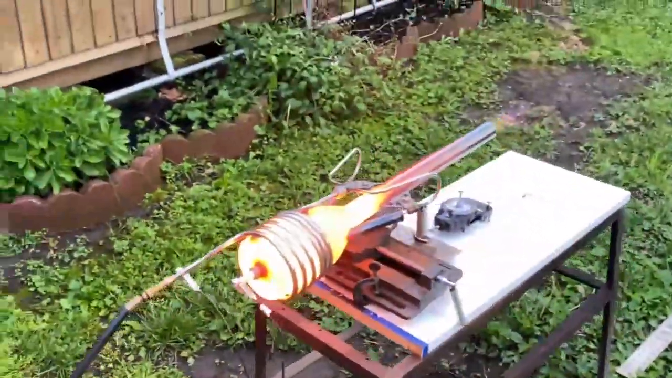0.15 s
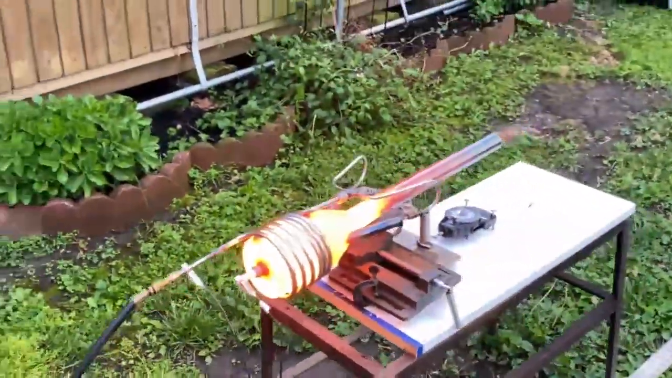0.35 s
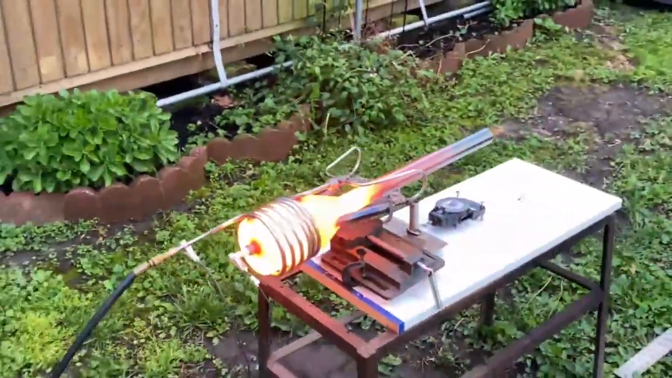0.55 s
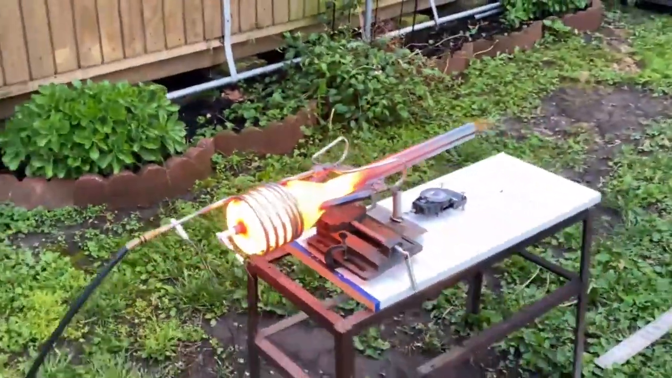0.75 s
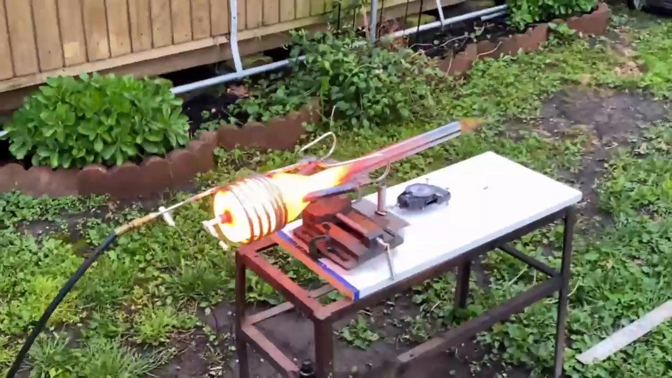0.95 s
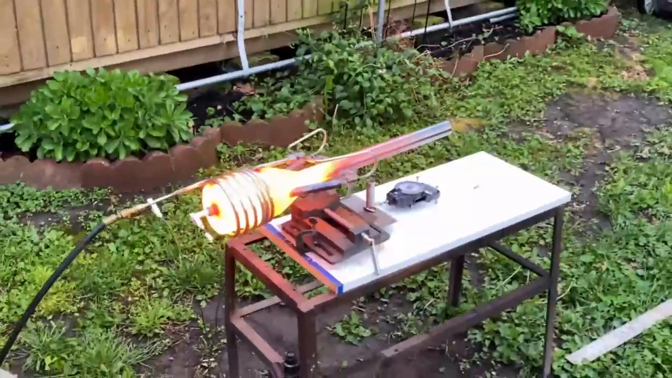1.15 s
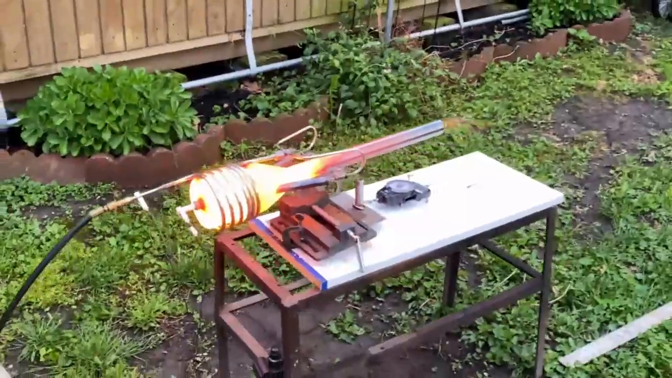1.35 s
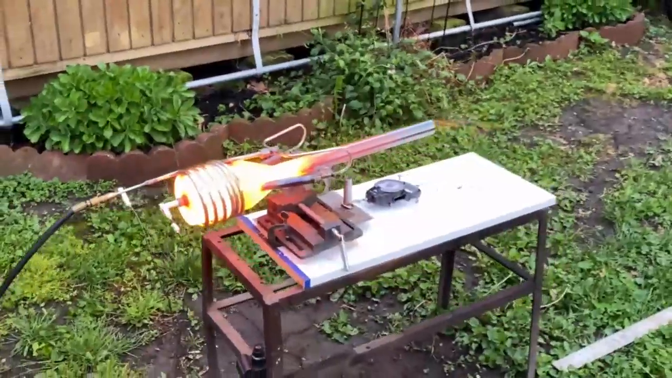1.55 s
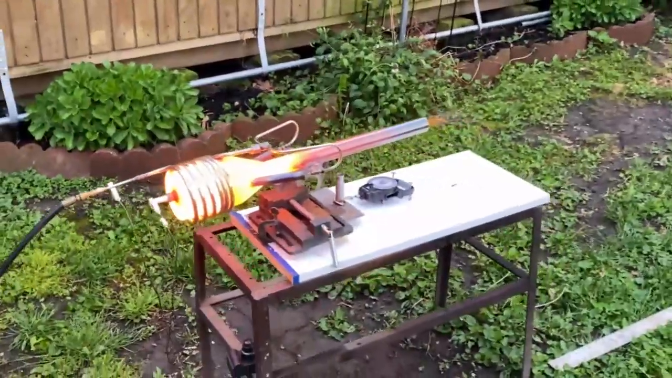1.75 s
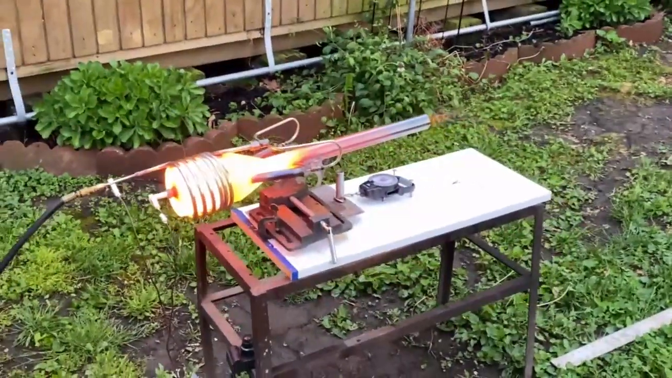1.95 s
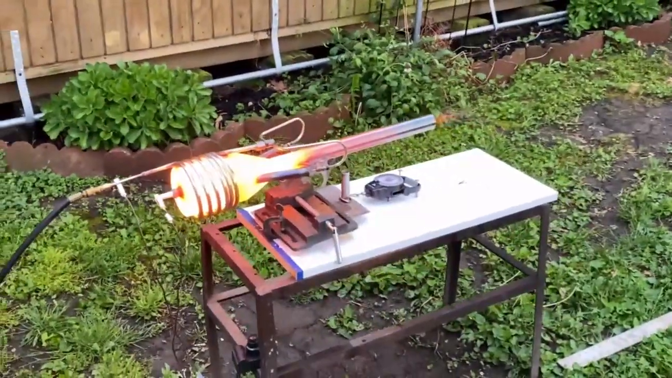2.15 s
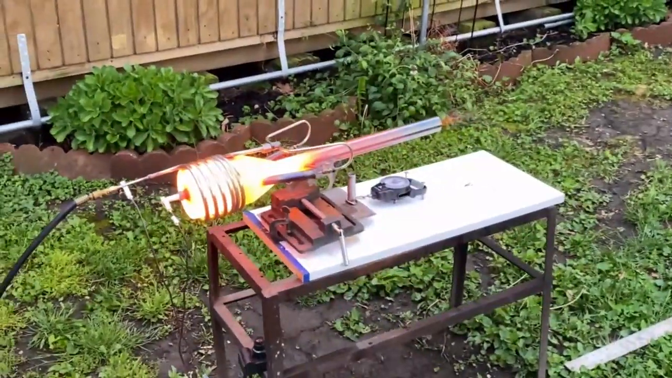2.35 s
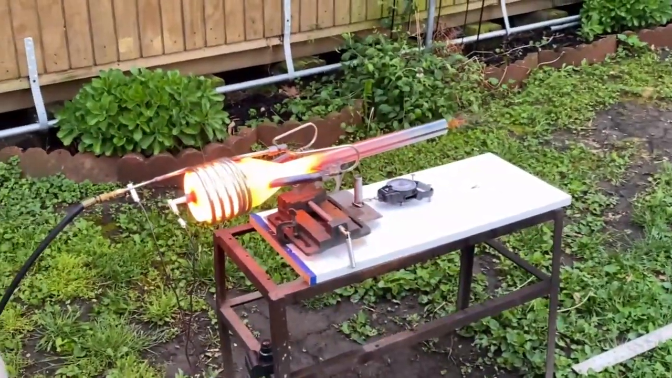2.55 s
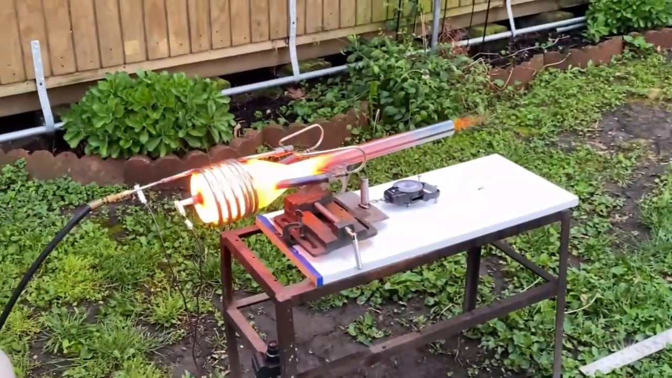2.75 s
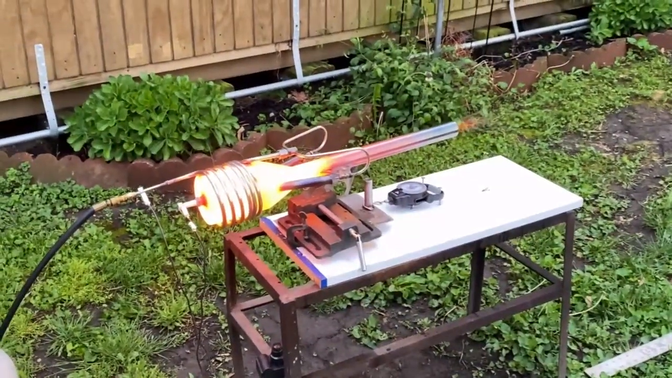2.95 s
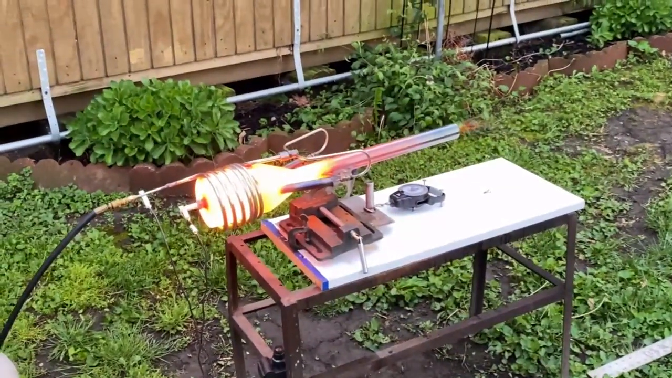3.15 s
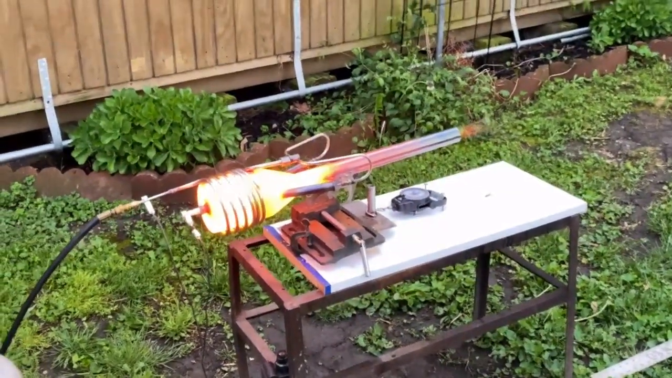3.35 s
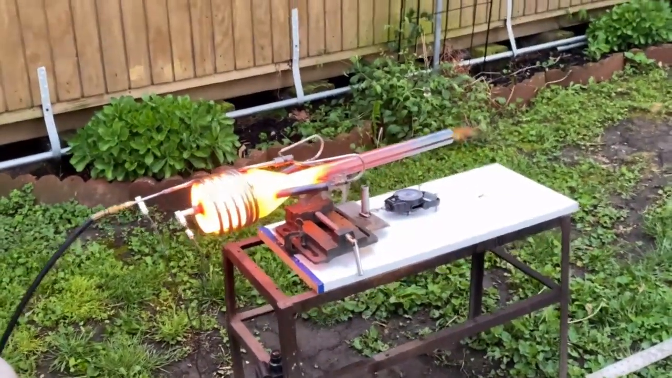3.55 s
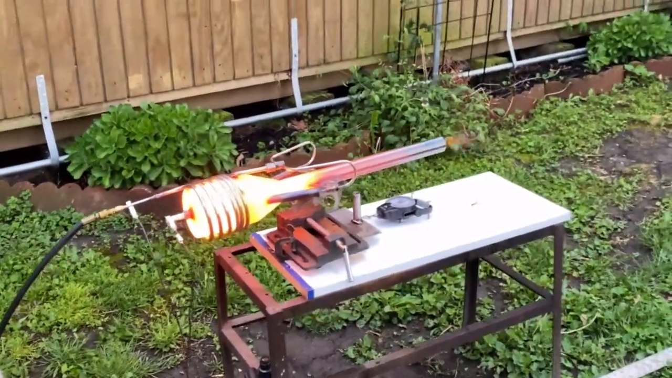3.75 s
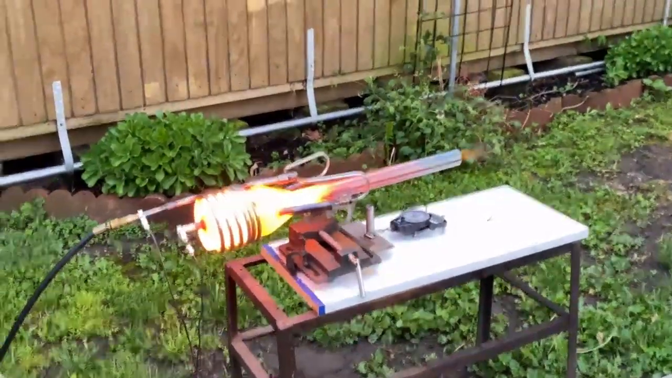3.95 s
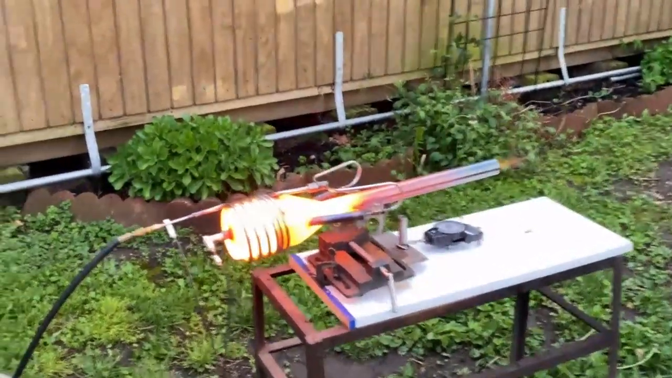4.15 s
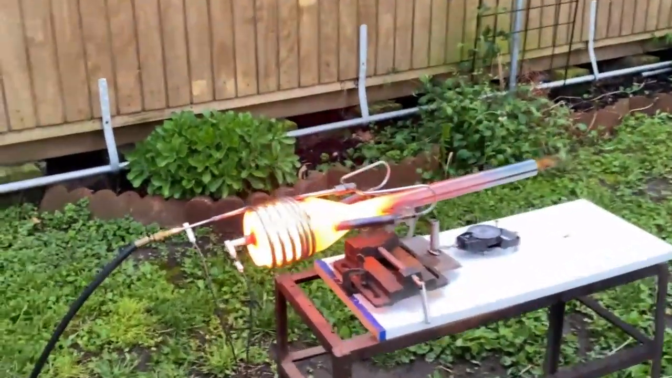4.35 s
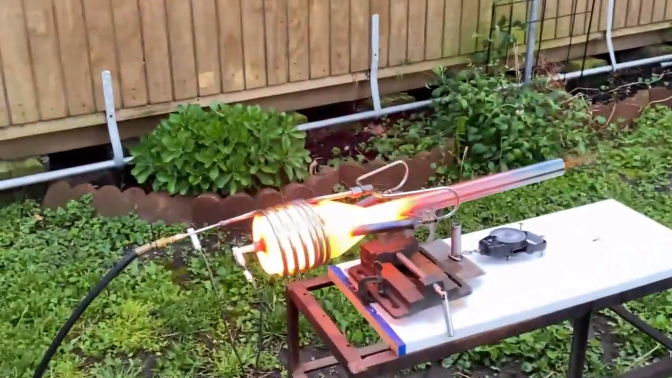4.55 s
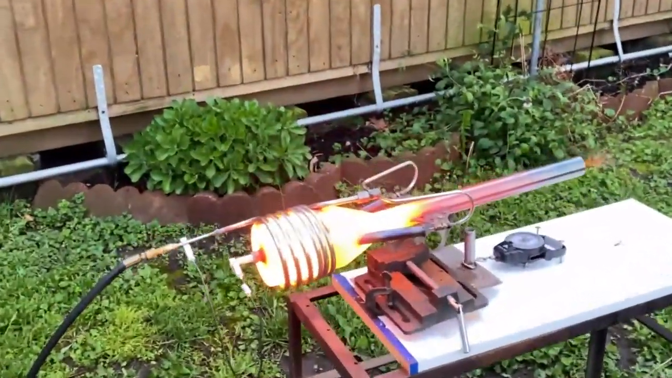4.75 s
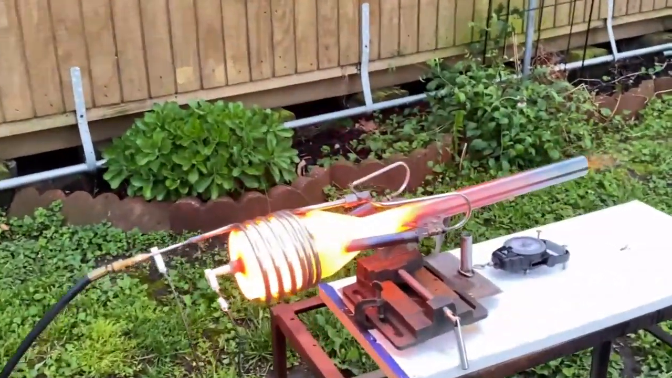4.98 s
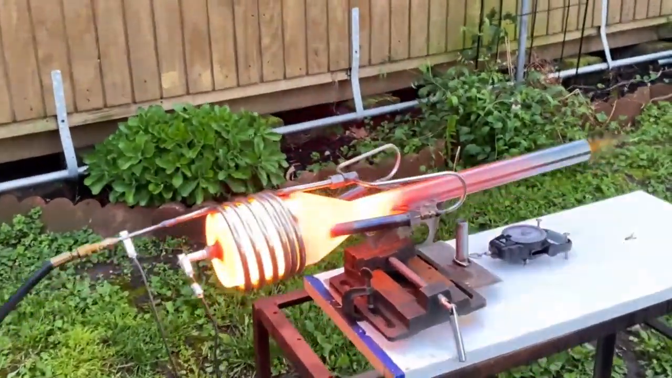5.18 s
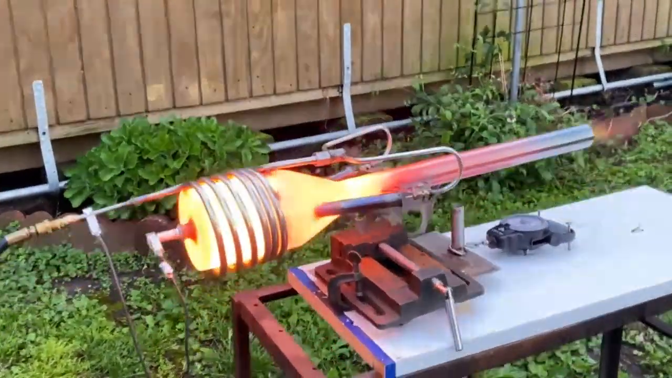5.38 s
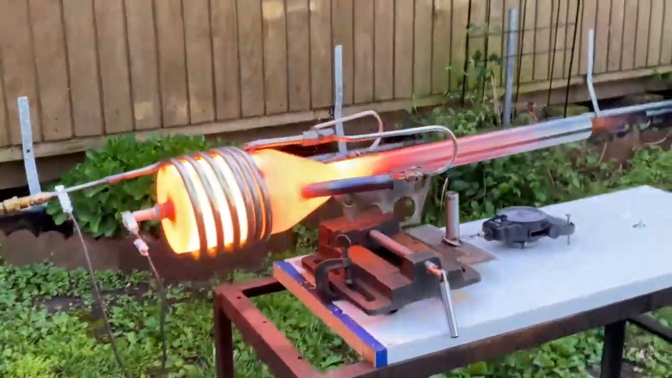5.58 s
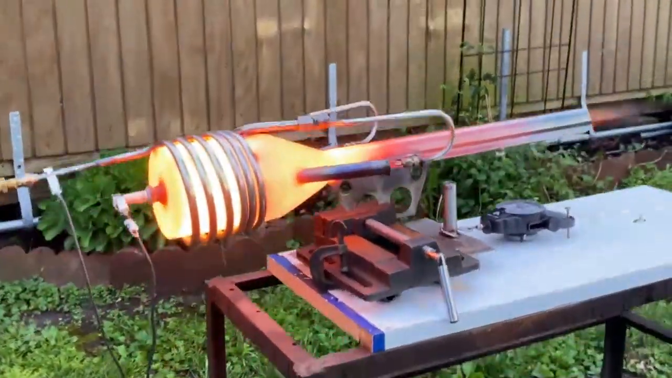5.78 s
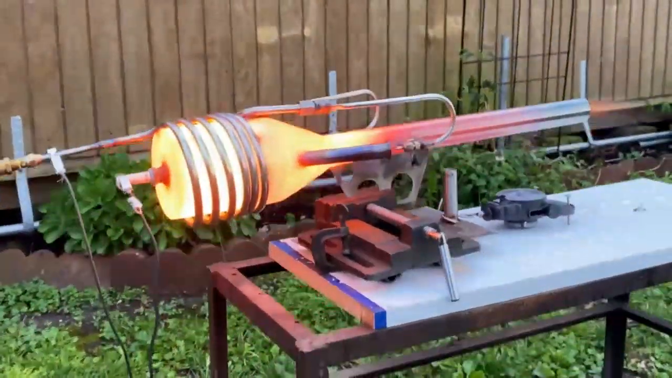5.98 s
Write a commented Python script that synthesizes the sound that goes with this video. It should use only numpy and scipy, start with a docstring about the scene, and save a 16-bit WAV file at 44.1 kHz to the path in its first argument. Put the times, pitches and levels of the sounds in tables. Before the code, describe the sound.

A small pulse jet is already running at full blast and never stops. It fires about 183 times a second, too fast to hear separate bangs, making a hard, nearly steady buzz with a low hum and strong upper overtone. Over it lie a turbulent exhaust roar, strongest around the middle frequencies, and a bright, tearing intake rasp that flutters each cycle. From 0 to 1 second the microphone backs off from just over a metre and the noise softens a little; the low hum thins. From 1 to about 3.5 seconds it holds steady, with two tiny dips in the overtone near 1.7 and 1.8. From 4 seconds the pitch edges up very slightly and the microphone closes in; roar, rasp and deep hum swell, loudest around 5.2 to 5.8 seconds, staying strong to the abrupt end at 6. Open air, no noticeable echo.

```python
"""Small pulse jet, heard closer at the end

A small pulse jet fires about 183 times a second while the microphone backs off and then moves closer.
The air column in the pipe drones on the firing rate and its multiples, built from wavering cosines.
Every cycle throws out a puff of roaring exhaust and, later in the cycle, a sharp rasp of intake air.
Both are bursts of shaped noise; the rasp rings faintly at the resonances of the short intake tube."""
import sys
import numpy as np
from scipy import signal
from scipy.fft import rfft, irfft, next_fast_len
from scipy.io import wavfile
from scipy.ndimage import map_coordinates

SR = 44100
rng = np.random.default_rng(int(sys.argv[2]) if len(sys.argv) > 2 else 0)


def to_wav(sig):
    """Store sig (one row per channel, or 1-D mono) as 16-bit WAV at the path in sys.argv[1].

    Samples outside -1..1 are clipped; the rate is SR.
    """
    pcm = np.clip(np.atleast_2d(sig), -1, 1) * 32767
    pcm = np.round(pcm).astype(np.int16)
    wavfile.write(sys.argv[1], SR, pcm.T)  # frames by channels


N = 265482

# The engine speeds up a little in the second half.
# Each row: time in seconds, firing rate in Hz.
FIRING_RATE = [(0, 183.5), (.5, 182.9), (1.5, 182.4), (2.2, 182.6), (3.2, 182.9), (4.1, 184.2),
               (4.9, 185.1), (5.4, 185), (5.6, 184.3), (6, 184.4)]
# The microphone backs off, lingers, then closes in.
# Each row: time in seconds, distance from the engine in metres.
MIC_DISTANCE = [(0, 1.3), (.3, 1.32), (.9, 1.46), (2, 1.47), (3.4, 1.46), (4.4, 1.33), (5.1, 1),
                (5.7, 0.89), (6, 0.94)]
# The two longest waves swell and fade from place to place around the engine.
# Each row: time in seconds, level of the first tone in dB, level of the second tone in dB.
LOW_TONE_LEVELS = [(0.06, -34.5, -40.5), (0.49, -36, -36), (1.18, -41.5, -37), (1.96, -41, -39.5),
                   (3.35, -40.5, -41), (3.58, -41, -43.5), (4.38, -40, -39), (4.78, -36, -35.5),
                   (4.81, -34.5, -32.5), (5.4, -34, -28.5), (5.96, -34, -28.5)]
# Each row: time in seconds, level of the fourth tone in dB.
FOURTH_TONE_LEVEL = [(0, -34), (.8, -36.5), (1.7, -33.5), (4.2, -35.5), (4.75, -34), (5.25, -31), (6, -36)]
# Brief dips of the fourth tone.
# Each row: middle of the dip in seconds, depth in dB, length in seconds.
FOURTH_TONE_DIPS = [(1.683, 4.4, 0.027), (1.792, 8.8, 0.023), (5.97, 5.8, 0.019)]
# Overtones of the steep front of the pressure wave.
# Each row: multiple of the firing rate, level in dB, extra dB at the microphone's first position.
FRONT_OVERTONES = [(5, 0, -12), (6, -6, 3), (7, -6, -2), (8, -4.5, -14), (10, -14, -4), (11, -14, -4)]
# Colour of the exhaust noise. Each row: frequency in Hz, relative strength in dB per Hz.
ROAR_COLOUR = [(25, -43), (60, -30.5), (120, -17), (250, -10.5), (420, -3.5), (600, -2), (790, 5.5),
               (1000, 0), (1350, 2.5), (2000, 0.5), (2700, -2.5), (4000, -11), (8000, -13.5),
               (16000, -19.5)]
# Colour of the intake rasp. Each row: frequency in Hz, relative strength in dB per Hz.
RASP_COLOUR = [(400, -33), (1500, -21), (2500, -6.5), (3400, -1.5), (4500, -1.5), (6000, 0), (7800, -2),
               (10500, -5.5), (12000, -7), (15000, -8), (16000, -19.5)]
# The duller end of each gulp of air. Each row: frequency in Hz, relative strength in dB per Hz.
GULP_COLOUR = [(500, -30), (1400, -8.5), (2200, -0.5), (3300, 1.5), (4200, -2), (6000, -7), (9000, -27),
               (16000, -33)]
# Resonances of the short intake tube. Each row: frequency in Hz, width in Hz, lift in dB.
INTAKE_RESONANCES = [(3180, 450, 3), (6480, 480, 4), (10000, 640, 1)]
# A hollow in the noise shifts as the microphone moves.
# Each row: time in seconds, centre in Hz, gain in dB, reach to either side in Hz.
NOISE_HOLLOW = [(0, 1470, -0.5, 300), (.6, 1570, -4.5, 450), (.9, 2120, -4, 650), (3.35, 2100, -5.5, 604),
                (3.45, 3060, -5.5, 500), (5.1, 2820, -6.5, 523), (5.7, 2250, -7.5, 700),
                (6, 2280, -6.5, 680)]
# A faint bright spot in the hiss shifts too.
# Each row: time in seconds, centre in Hz, gain in dB, reach to either side in Hz.
BRIGHT_SPOT = [(0, 9000, 2, 1100), (1, 8600, 3, 500), (1.5, 13200, 0.5, 1400), (3, 12900, 1, 1600),
               (3.6, 11600, -.5, 800), (4.3, 11400, 4, 500), (4.8, 9900, 2, 800), (6, 9500, 0, 1000)]

THIRD_DB = -40.5  # the third tone is equally strong everywhere
WAVER_DB, WAVER_PER_S = 0.27, 9  # slow unsteadiness of the third and fourth tones
ROAR_DB, RASP_DB, TREBLE_DB, FRONT_DB = -34, -33, -37.9, -43  # base levels at 1 m
# Each part falls as 1 / distance to this power.
ROAR_FALL, RASP_FALL, TREBLE_FALL, FRONT_FALL = 0.82, 0.98, 1.1, 1.56
SETTLE_S = 0.92  # the overtones' extra dB fade over this time as the microphone backs off
SPIKY_DB = 1.1  # fast swings of strength inside each rasp
TOP_HZ = 16000  # upper limit of the recorder


def amp(db):
    """Turn decibels into a gain."""
    return 10 ** (np.asarray(db) / 20)


def unit(x):
    """Scale x to an average strength (rms) of 1."""
    return x / np.sqrt(np.mean(x ** 2) + 1e-20)


def curves(rows):
    """Draw straight lines between the rows: one curve for each column after the time."""
    times, *columns = np.transpose(rows)
    return [np.interp(np.arange(N) / SR, times, column) for column in columns]


def wobble(rate):
    """Make a smooth random curve of rms 1 that passes through rate random points a second."""
    points = rng.standard_normal(N // 16)
    return unit(map_coordinates(points, [np.arange(N) * rate / SR], mode="wrap"))


def filtered(x, response):
    """Multiply the spectrum of x by a gain that depends on frequency."""
    size = next_fast_len(N + SR // 2)  # room for the filter to ring out
    gain = response(np.fft.rfftfreq(size, 1 / SR))
    return irfft(rfft(x, size) * gain, size)[:N]


def coloured(x, spectrum, resonances=()):
    """Shape x by a spectrum, lift it at its resonances, and scale it to rms 1."""
    points_hz, points_db = np.transpose(spectrum)

    def response(hz):
        colour_db = np.interp(np.log(hz + 1), np.log(points_hz), points_db)
        peaks_db = sum(lift_db / (1 + (2 * (hz - centre_hz) / width_hz) ** 2)
                       for centre_hz, width_hz, lift_db in resonances)
        return amp(colour_db + peaks_db)

    return unit(filtered(x, response))


def bursts(cycles, start, rise, fall, scatter_db):
    """Noise flares once a cycle, each time at a new strength; start, rise and fall are parts of a cycle."""
    number, age = np.divmod(cycles - start + 2, 1)
    strengths = amp(scatter_db * rng.standard_normal(N // 100))
    strength = strengths[number.astype(int)]
    flare = (1 - np.exp(-(age / rise) ** 2)) * np.exp(-age / fall)
    return unit(strength * flare * rng.standard_normal(N))


def spread(level_db, fall):
    """Sound thins out with distance: gain at the moving microphone for a level given at 1 m."""
    distance_m = curves(MIC_DISTANCE)[0]
    return amp(level_db) / distance_m ** fall


def pipe_tone(cycles, order, flutter_db, slip, dispersion=0.772):
    """One air-column tone; uneven combustion shakes its strength and its phase (slip, in radians)."""
    shake = unit(wobble(32) + 0.72 * wobble(130))
    # low and high tones cross the hot, tapered pipe at different speeds
    lag = dispersion * (order - 3) ** 2
    phase = 2 * np.pi * order * cycles + lag + slip * wobble(90)
    return -unit(amp(flutter_db * shake) * np.cos(phase))


def waver():
    """A slow random gain for the unsteady tones."""
    return amp(WAVER_DB * wobble(WAVER_PER_S))


def drone(cycles):
    """The pipe holds the lowest tone steady; higher tones waver more and the fourth sometimes falters."""
    first_db, second_db = curves(LOW_TONE_LEVELS)
    fourth_db = curves(FOURTH_TONE_LEVEL)[0]
    t = np.arange(N) / SR
    dip_db = sum(depth_db * np.exp(-(2 * (t - middle_s) / length_s) ** 2)
                 for middle_s, depth_db, length_s in FOURTH_TONE_DIPS)
    first = amp(first_db) * pipe_tone(cycles, order=1, flutter_db=0.23, slip=0.012)
    second = amp(second_db) * pipe_tone(cycles, order=2, flutter_db=0.34, slip=0.04)
    third = amp(THIRD_DB) * waver() * pipe_tone(cycles, order=3, flutter_db=0.05, slip=0.061)
    fourth = amp(fourth_db - dip_db) * waver() * pipe_tone(cycles, order=4, flutter_db=1.0, slip=0.072)
    return first + second + third + fourth


def front(cycles):
    """The pressure wave steepens in the pipe and gains weak overtones that come and go."""
    early = np.interp(np.arange(N) / SR, [0, SETTLE_S], [1, 0])
    tones = 0
    for multiple, level_db, offset_db in FRONT_OVERTONES:
        gain = amp(level_db + early * offset_db + 2.2 * wobble(2.41))
        tones = tones + gain * pipe_tone(cycles, order=round(multiple), flutter_db=0.5, slip=0.32)
    return spread(FRONT_DB, FRONT_FALL) * tones


def exhaust(cycles):
    """Each blast pushes a turbulent puff out of the tailpipe, over a steady rush."""
    puffs = bursts(cycles, start=-0.19, rise=0.26, fall=0.39, scatter_db=1.84)
    rush = 0.65 * rng.standard_normal(N)
    return spread(ROAR_DB, ROAR_FALL) * coloured(puffs + rush, ROAR_COLOUR)


def intake(cycles):
    """Air tears through the narrow intake once a cycle: a bright, spiky rasp that dulls as the flow slows."""
    uneven = cycles + 0.01 * wobble(180)
    tear = bursts(uneven, start=0.5, rise=0.2, fall=0.13, scatter_db=0.2)
    tear = unit(tear * amp(SPIKY_DB * wobble(2500)))
    hiss = 0.37 * rng.standard_normal(N)
    bright = coloured(tear + hiss, RASP_COLOUR, INTAKE_RESONANCES)
    gulp = bursts(uneven, start=0.72, rise=0.23, fall=0.12, scatter_db=0.5)
    dull = coloured(gulp, GULP_COLOUR, INTAKE_RESONANCES)
    rasp = bright + amp(-4.0) * dull
    # the treble, above about 8000 Hz, is beamed: its share depends on where the microphone stands
    treble = filtered(rasp, lambda hz: 1 / (1 + (8000 / (hz + 1)) ** 8))
    body = spread(RASP_DB, RASP_FALL) * unit(rasp - treble)
    return body + spread(TREBLE_DB, TREBLE_FALL) * unit(treble)


def patches(hz, t, span_hz, rate):
    """A smooth random field of rms 1, with random points span_hz apart and rate of them a second."""
    grid = np.meshgrid(hz / span_hz, t * rate, indexing="ij")
    return unit(map_coordinates(rng.standard_normal(grid[0].shape), grid, mode="wrap"))


def shifting(x, bands, patchy_db, shimmer_db):
    """Lift or sink moving bands, and add the drifting patches of colour from turbulence and motion."""
    hz, t, spectrum = signal.stft(x, SR, nperseg=512)
    for band in bands:
        times, *columns = np.transpose(band)
        centre_hz, gain_db, reach_hz = [np.interp(t, times, column) for column in columns]
        away = (hz[:, None] - centre_hz) / reach_hz
        spectrum = spectrum * amp(gain_db * np.exp(-np.abs(away) ** 3))
    slow = patches(hz, t, span_hz=327.0, rate=2.46)
    fast = patches(hz, t, span_hz=505, rate=25)
    spectrum = spectrum * amp(patchy_db * slow + shimmer_db * fast)
    return signal.istft(spectrum, SR, nperseg=512)[1][:N]


def scene():
    """One firing cycle drives the drone, wave front, exhaust and intake."""
    rate_hz = curves(FIRING_RATE)[0] + 0.35 * wobble(45) + 0.15 * wobble(5)
    cycles = np.cumsum(rate_hz) / SR  # firing cycles counted so far
    noise = exhaust(cycles) + intake(cycles)
    jets = shifting(noise, [NOISE_HOLLOW, BRIGHT_SPOT], patchy_db=0.55, shimmer_db=0.63)
    return (drone(cycles) + front(cycles) + jets)[None]


def record(dry):
    """The recorder keeps nothing above its band limit."""
    return filtered(dry[0], lambda hz: hz < TOP_HZ)[None]


dry = scene()
out = record(dry)
to_wav(out)
```